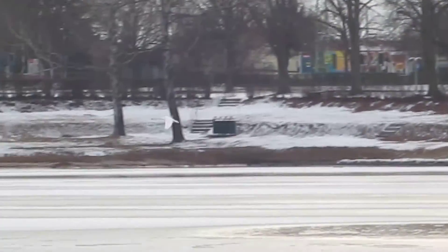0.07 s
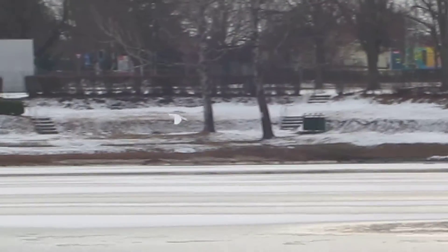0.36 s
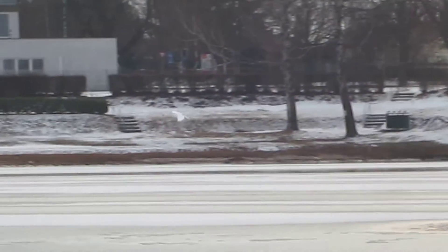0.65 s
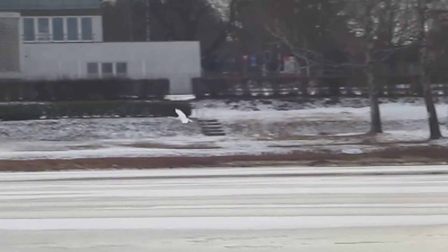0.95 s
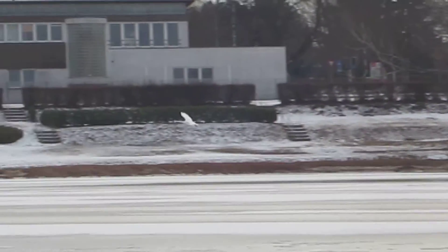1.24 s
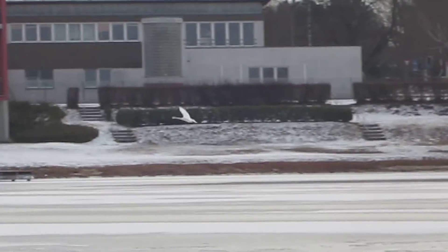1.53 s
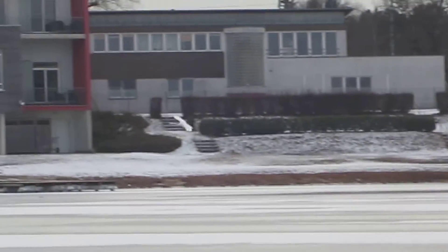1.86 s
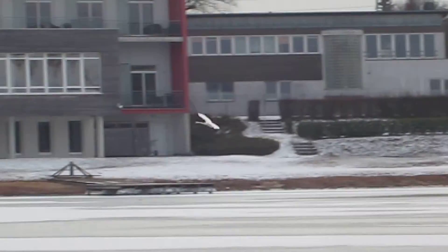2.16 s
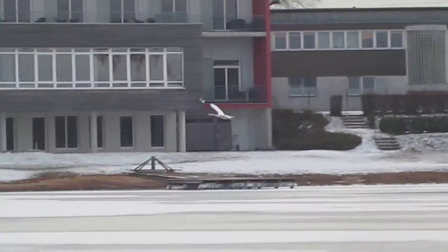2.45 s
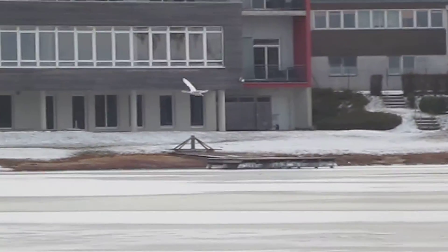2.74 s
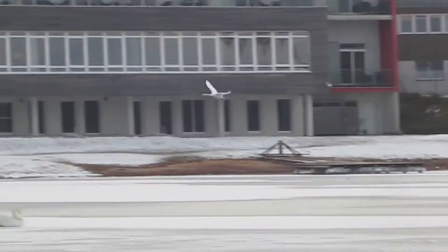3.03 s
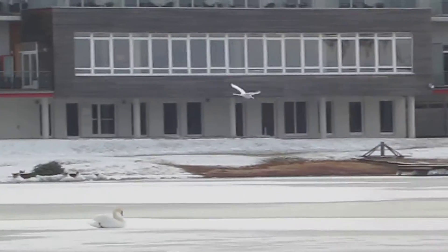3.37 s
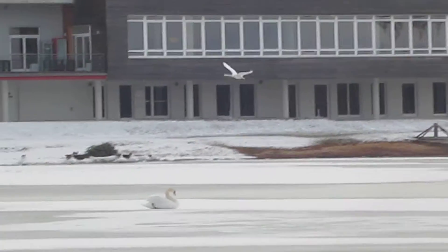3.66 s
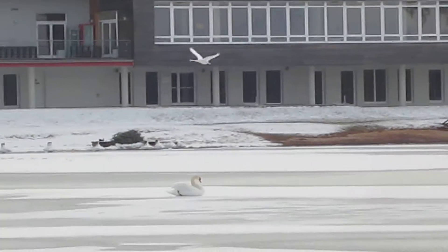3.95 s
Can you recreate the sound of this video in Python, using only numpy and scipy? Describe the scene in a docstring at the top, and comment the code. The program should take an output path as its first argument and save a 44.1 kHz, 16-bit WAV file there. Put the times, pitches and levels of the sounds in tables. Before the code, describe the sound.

Short wind gusts thump the microphone while a large bird flaps faintly far off.

```python
"""A frozen lake, with the broadband hum of a town's traffic in the distance.
Far off a large bird flaps past: air rushing over its feathers makes a few hoarse, whistling swishes.
In front, turbulent pressure buffets the microphone in short gusts; the hardest eddies knock,
overload it and make it crackle. The camera whines thinly and ticks now and then.
Town and camera dip briefly in level after the strongest gusts."""
import sys
import numpy as np
from scipy import signal
from scipy.fft import rfft, irfft
from scipy.io import wavfile
from scipy.ndimage import uniform_filter1d, minimum_filter1d, map_coordinates

SR = 44100
rng = np.random.default_rng(int(sys.argv[2]) if len(sys.argv) > 2 else 0)


def file_out(sig):
    """Save sig as 16-bit WAV at sys.argv[1]."""
    # one column per channel
    cols = np.atleast_2d(sig).T
    # limit, then scale
    lim = np.clip(cols, -1, 1)
    pcm = np.round(lim * 32767).astype(np.int16)
    wavfile.write(sys.argv[1], SR, pcm)


N = 176400
T = np.arange(N) / SR
FREQ = np.maximum(np.arange(N // 2 + 1) * SR / N, 1)


def undb(db):
    """The decibel law: 20 dB is a factor of ten in amplitude."""
    return 10 ** (np.asarray(db) / 20)


def colour(points, scale=1):
    """Spectral envelope: gains interpolated in dB over log frequency, shifted by the ratio `scale`."""
    hz, db = np.array(points).T
    return undb(np.interp(np.log(FREQ / scale), np.log(hz), db))


def unit(x):
    """Normalisation to an rms of 1."""
    return x / np.sqrt(np.mean(x ** 2))


def noise(gain):
    """Spectral shaping: white noise filtered by `gain`, at an rms of 1."""
    return unit(irfft(rfft(rng.standard_normal(N)) * gain, N))


def drift(rate_hz):
    """Random modulation: low-pass noise with an rms of 1."""
    return noise(np.exp(-(FREQ / rate_hz) ** 2))


def pan(db):
    """Intensity stereo: two gains for a left-minus-right level difference."""
    return undb(np.array([[1], [-1]]) * db / 2)


def swell(t, length, attack_s, release_s):
    """Amplitude envelope: a quarter-sine rise, a hold and a quarter-sine fall."""
    return np.sin(np.pi / 2 * np.clip(np.minimum(t / attack_s, (length - t) / release_s), 0, 1))


def add(out, start, x):
    """Superposition: a short sound joins the mix at `start` seconds."""
    i = int(start * SR)
    out[..., i:i + x.shape[-1]] += x[..., :N - i]


# Spectrum of the town's hum and hiss. Each row: frequency in Hz, relative spectral density in dB.
TOWN_SPECTRUM = [(20, -11.5), (60, -3), (200, -5), (232, 1.5), (275, -0.5), (300, -8.5), (335, -5),
                 (400, -15), (600, -20.5), (800, -19.5), (1050, -27), (1500, -31), (2200, -31),
                 (3000, -40.5), (4000, -45), (4800, -41.5), (5600, -46.5), (10000, -55.5), (12000, -72),
                 (14000, -68), (16000, -55)]
# Direction of the town. Each row: frequency in Hz, left minus right level in dB.
TOWN_DIRECTION = [(80, -6), (200, -1), (400, 1), (750, 4), (1700, 3), (6000, 1.5)]
# Stereo width of the town. Each row: frequency in Hz, side minus mid level in dB.
TOWN_WIDTH = [(90, 3.5), (170, 0.5), (290, -4), (500, 1.5), (3000, 2.5)]


def town(level_db=-41):
    """Incoherent summation: distant traffic merges into steady noise, wide because the channels differ."""
    mid, side = rfft(rng.standard_normal((2, N)))
    width = colour(TOWN_WIDTH)
    diffuse = (mid + np.array([[1], [-1]]) * side * width) / np.hypot(1, width)
    balance = colour(TOWN_DIRECTION) ** np.array([[.5], [-.5]])
    return unit(irfft(diffuse * colour(TOWN_SPECTRUM) * balance, N)) * undb(level_db)


# The camera's whine. Each row: frequency in Hz, relative level in dB, left minus right level in dB.
WHINE_TONES = [(3270, -88, 20), (4760, -86.5, 11.5)]


def camera_whine(wander_hz=7):
    """Frequency modulation: slight random wander spreads each thin tone into a narrow band."""
    out = np.zeros((2, N))
    for hz, db, pan_db in WHINE_TONES:
        phase = 2 * np.pi * np.cumsum(hz + wander_hz * drift(25)) / SR
        out += np.sqrt(2) * np.sin(phase) * undb(db) * pan(pan_db)
    return out


# The camera's ticks. Each row: start in seconds, relative level in dB.
TICK_EVENTS = [(0.191, -61.5), (0.612, -69), (0.689, -61), (1.447, -67.5), (1.694, -64.5), (2.195, -65.5)]
# Spectrum of a tick. Each row: frequency in Hz, relative level in dB.
TICK_SPECTRUM = [(1500, -17), (2600, -8), (3100, 8), (4600, -3), (10000, -40)]


def camera_ticks(decay_s=0.004):
    """Damped transients: each tick is a band of noise that starts at once and decays exponentially."""
    envelope = sum(undb(db) * (T >= start) * np.exp(-np.abs(T - start) / decay_s)
                   for start, db in TICK_EVENTS)
    return envelope * noise(colour(TICK_SPECTRUM)) * pan(16.5)


# The bird's wingbeats. Each row: start in seconds, length in seconds, level in dB, centre in Hz.
WING_STROKES = [(-.03, 0.24, -54, 1883), (0.157, 0.21, -57, 1857), (0.434, 0.24, -55.5, 1850),
                (0.753, 0.2, -53.5, 1838), (1.211, 0.24, -57.5, 1790), (1.565, 0.2395, -55.5, 1804),
                (2.056, 0.12, -60, 1827)]
# Spectrum of a swish. Each row: frequency as a multiple of the centre, relative level in dB.
SWISH_SPECTRUM = [(.4, -35), (.7, -11.5), (.96, -4), (1.12, -6.5), (1.3, -17), (3, -72.5)]


def wings(flutter_hz=78.2, flutter_depth=0.08, whistle_db=-6.5, wander_share=0.035, sag_per_s=0.2):
    """Aerodynamic sound: air over feathers makes a fluttering swish around a wavering, sinking whistle."""
    out = np.zeros((2, N))
    flutter_rate = flutter_hz * (1 + .25 * drift(30))
    flutter = 1 + flutter_depth * np.sin(2 * np.pi * np.cumsum(flutter_rate) / SR)
    # Distance diffuses the sound, so each channel has its own wander and noise.
    wander = 1 + wander_share * np.array([drift(flutter_hz), drift(flutter_hz)])
    for start, length, db, centre_hz in WING_STROKES:
        spectrum = colour(SWISH_SPECTRUM, centre_hz)
        swish = np.array([noise(spectrum), noise(spectrum)])
        pitch = centre_hz * (wander - sag_per_s * (T - start - length / 2))
        whistle = undb(whistle_db) * np.sqrt(2) * np.sin(2 * np.pi * np.cumsum(pitch, axis=1) / SR)
        envelope = swell(T - start, length, attack_s=0.071, release_s=0.094)
        out += (swish + whistle) * envelope * undb(db)
    return out * flutter * pan(-4)


def eddy_spectrum(f, corner_hz, low_cut_hz=59.6, port_hz=153, port_db=2, port_octaves=0.92):
    """Turbulent cascade: pressure falls off above a corner; the microphone port adds a broad resonance."""
    octaves = np.log2(np.maximum(f, 1) / port_hz)
    resonance = undb(port_db * np.exp(-(octaves / port_octaves) ** 2))
    low_cut = f / np.hypot(f, low_cut_hz)
    slope = (1 + (f / corner_hz) ** 2) ** -1.98
    knee = 1 / (1 + (f / (2.71 * corner_hz)) ** 4)
    return resonance * low_cut * slope * knee


# Gusts of wind. Each row: start in seconds, length in seconds, level in dB, spectral corner in Hz.
GUST_EVENTS = [(0.878, 0.05, -21.5, 220), (0.926, 0.045, -16, 350), (.984, 0.11, -19.5, 215),
               (1.119, .024, -14.5, 400), (1.577, 0.049, -22.5, 340), (1.74, 0.024, -16, 341),
               (1.762, 0.058, -21, 258), (1.812, 0.049, -9, 274), (1.862, 0.072, -14, 314),
               (1.91, 0.1, -17, 261), (1.974, .085, -19, 326), (2.074, 0.025, -18, 700),
               (2.161, 0.016, -15, 290), (2.203, 0.023, -20.5, 340), (2.244, 0.046, -18, 366),
               (2.417, 0.054, -18, 495), (2.532, 0.042, -21.5, 377), (2.591, 0.038, -21.5, 356),
               (2.89, 0.01, -20.5, 800), (2.905, 0.036, -16.5, 740), (3.062, 0.019, -15.5, 380),
               (3.083, 0.021, -19, 450), (3.195, 0.042, -24, 476), (3.218, 0.022, -5.5, 494),
               (3.261, 0.078, -13.5, 352), (3.336, 0.079, -25.5, 310), (3.424, 0.094, -19, 292),
               (3.479, 0.047, -18.5, 380), (3.525, 0.051, -25.5, 370), (3.578, 0.052, -20.5, 384),
               (3.623, 0.075, -18.5, 410), (3.702, 0.051, -17, 458), (3.752, 0.022, -22.5, 610),
               (3.799, 0.069, -22, 505), (3.909, 0.036, -19, 594), (3.951, 0.039, -12, 538)]


def gusts(size=8192, flutter_depth=0.32, flutter_hz=69, brightening=0.45, ceiling=0.56, low_cut_hz=40.7):
    """Turbulent pressure at two microphone ports: faster air is louder and brighter; peaks saturate."""
    out = np.zeros((2, N))
    t, f = np.arange(size) / SR, np.fft.rfftfreq(size, 1 / SR)
    flutter = np.exp(flutter_depth * drift(flutter_hz))
    for k, (start, length, db, corner_hz) in enumerate(GUST_EVENTS):
        air = irfft(rfft(rng.standard_normal((2, size))) * eddy_spectrum(f, corner_hz))
        speed = np.roll(flutter, k * size)[:size]
        position = np.cumsum(speed ** brightening)  # reading the noise faster raises its corner
        air = np.array([map_coordinates(port, [position], mode="mirror") for port in air])
        air = air * swell(t, length, attack_s=0.0069, release_s=0.022) * speed
        rms = np.sqrt(np.sum(air ** 2, axis=1, keepdims=True) / (length * SR))
        add(out, start, air / rms * undb(db))
    saturated = ceiling * np.tanh(out / ceiling)
    return irfft(rfft(saturated) * FREQ ** 2 / (FREQ ** 2 + low_cut_hz ** 2), N)


# Single hard eddies. Each row: time in seconds, peak before overload in dB, spectral corner in Hz.
HARD_EDDIES = [(0.892, 1.5, 237), (0.902, -7, 300), (.918, 6, 423), (.947, -9.5, 680), (1.001, -10, 190),
               (1.027, -4.5, 410), (1.065, -13.5, 416), (1.129, -3.5, 422), (1.75, -6, 380),
               (1.817, -1, 330), (1.824, -14, 322), (1.834, -7.5, 327), (1.878, -5.5, 506),
               (1.899, -2, 524), (2.017, -3, 440), (2.166, -6.5, 278), (2.259, -1.5, 475), (2.448, -7, 487),
               (2.598, -6, 490), (2.909, -4, 570), (3.069, -0.5, 341), (3.23, -1.5, 468),
               (3.243, -1.5, 254), (3.317, -4, 517), (3.32, 7, 810), (3.511, -4, 500), (3.608, -9, 540),
               (3.635, -5.5, 295), (3.68, 5, 508), (3.835, -2.5, 870), (3.914, -8.5, 500), (3.958, -2, 690),
               (3.962, -9, 630)]


def knocks(size=4096, low_cut_hz=170, skew_rad=1.22):
    """Bipolar pressure pulses: each hard eddy sucks at the port, then snaps over into a push."""
    out = np.zeros(N)
    f = np.fft.rfftfreq(size, 1 / SR)
    skew = np.exp(-1j * skew_rad)  # 0 gives a single push, pi / 2 equal suction and push
    for time, db, corner_hz in HARD_EDDIES:
        spectrum = eddy_spectrum(f, corner_hz) * f / np.hypot(f, low_cut_hz)
        pulse = np.roll(irfft(spectrum * skew), size // 2)
        add(out, time - size / 2 / SR, pulse / pulse.max() * undb(db))
    return out


def overload(pressure, window_s=0.0046):
    """Peak limiting: the gain falls smoothly wherever the pressure exceeds full scale."""
    span = int(window_s * SR)
    gain = minimum_filter1d(1 / np.maximum(np.abs(pressure), 1), span)
    return pressure * uniform_filter1d(uniform_filter1d(gain, span // 2), span // 2)


# Crackles of the microphone. Each row: time in seconds, level in dB, length in seconds.
CRACKLE_EVENTS = [(0.916, -30.5, 0.0013), (1.817, -34, 0.0013), (2.258, -33, 0.0015), (3.321, -29, 0.003),
                  (3.681, -39.5, 0.0061)]
# Spectrum of a crackle. Each row: frequency in Hz, relative level in dB.
CRACKLE_SPECTRUM = [(500, -22.5), (1200, 3.5), (3000, -3.5), (7000, -14), (15000, -23)]


def crackles():
    """Overload distortion: brief bursts of broadband noise accompany some of the hardest knocks."""
    envelope = sum(undb(db) * np.exp(-(2 * (T - time) / length) ** 2)
                   for time, db, length in CRACKLE_EVENTS)
    return envelope * noise(colour(CRACKLE_SPECTRUM))


def wind(displace_s=0.002, left_share=0.46, left_own_db=-14, rumble_hz=59):
    """Antiphase pressure: wind overloads the right port and appears weaker and inverted on the left."""
    right_air, left_air = gusts()
    # Each hard eddy displaces the small ones for an instant.
    gaps = np.prod([1 - np.exp(-((T - time) / displace_s) ** 2) for time, _, _ in HARD_EDDIES], axis=0)
    right = overload(right_air * gaps + knocks()) + crackles()
    rumble_shelf = undb(left_own_db) + 1 / (1 + (FREQ / rumble_hz) ** 2)
    left_rumble = irfft(rfft(left_air) * rumble_shelf, N)
    return np.array([left_rumble - left_share * right, right])


# Rise and dip of the town and camera together. Each row: time in seconds, gain in dB.
BACKGROUND_GAIN = [(0, -0.5), (.9, 2.5), (.93, -3), (1.14, -1), (1.8, 3), (1.84, -0.5), (2.24, 2.5),
                   (2.28, -1.5), (2.7, 0.5), (3.3, 0), (3.33, -9), (3.65, -3.5), (3.7, -10.5), (4, 0.5)]


def scene():
    """Superposition: wind in front; bird, town and camera behind it."""
    times, gain_db = np.array(BACKGROUND_GAIN).T
    background_gain = undb(np.interp(T, times, gain_db))
    return wind() + wings() + (town() + camera_whine() + camera_ticks()) * background_gain


def record(dry, cutoff_hz=15900):
    """Band limiting: a steep low-pass filter removes the highest treble."""
    return signal.sosfilt(signal.ellip(8, .2, 70, cutoff_hz, fs=SR, output="sos"), dry)


dry = scene()
out = record(dry)
file_out(out)
```